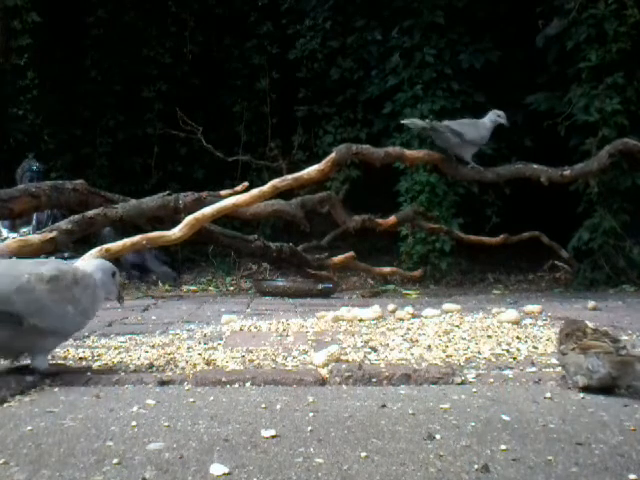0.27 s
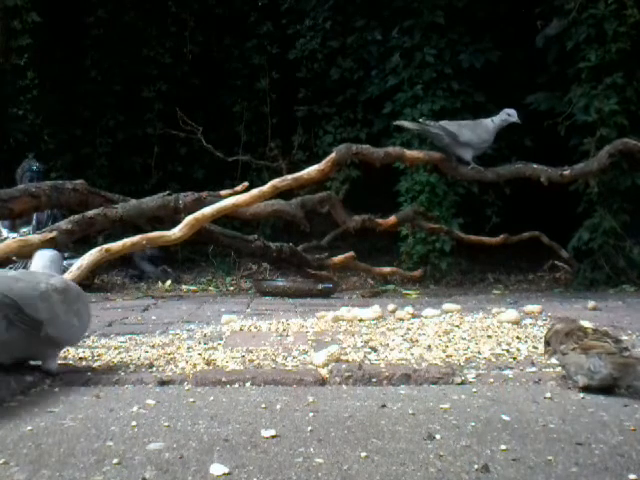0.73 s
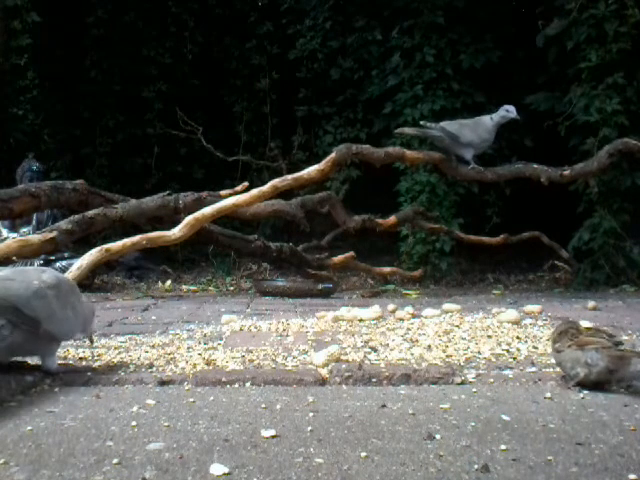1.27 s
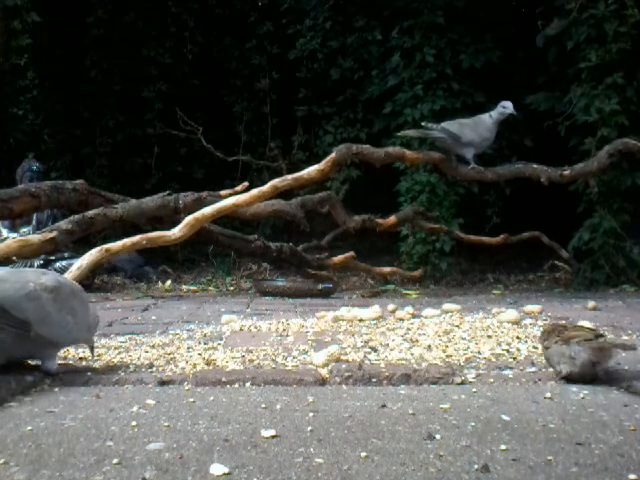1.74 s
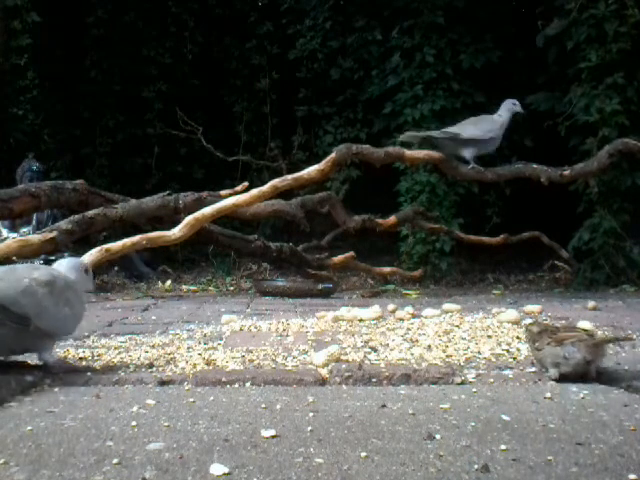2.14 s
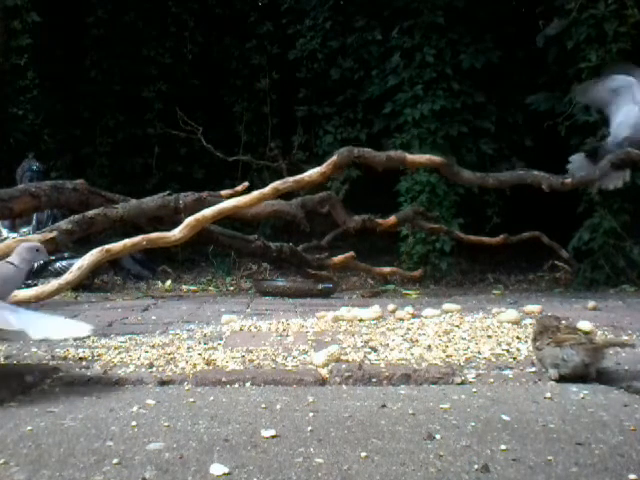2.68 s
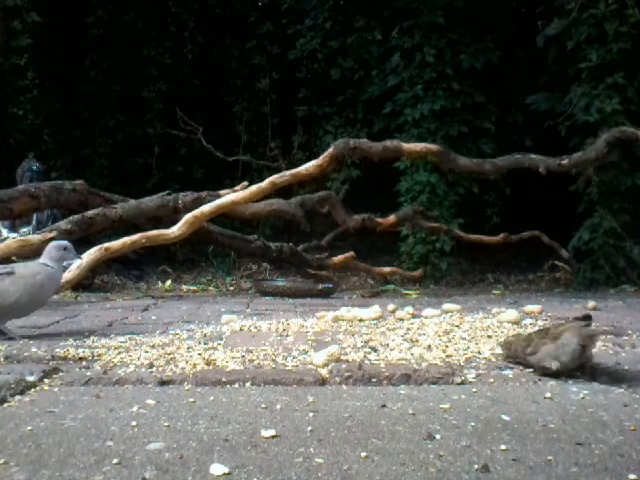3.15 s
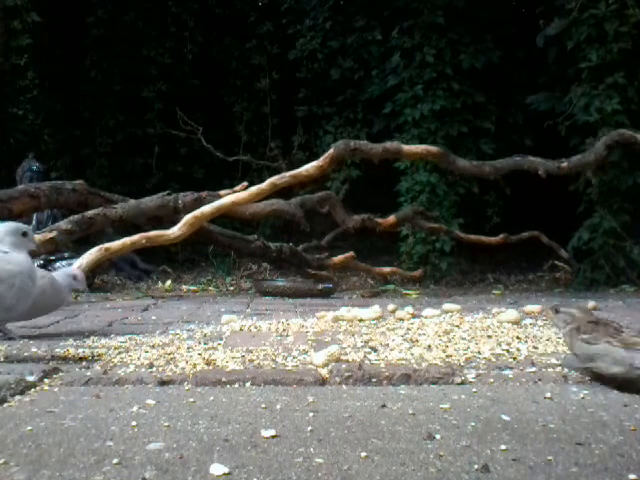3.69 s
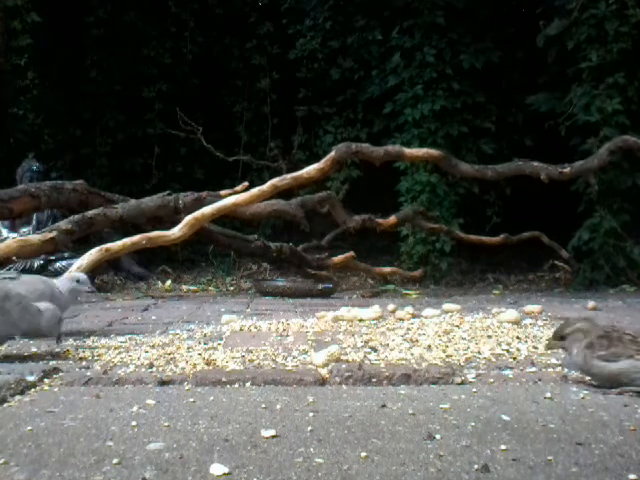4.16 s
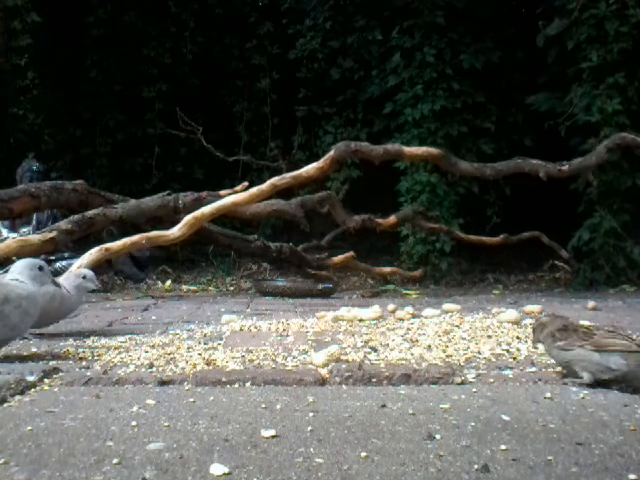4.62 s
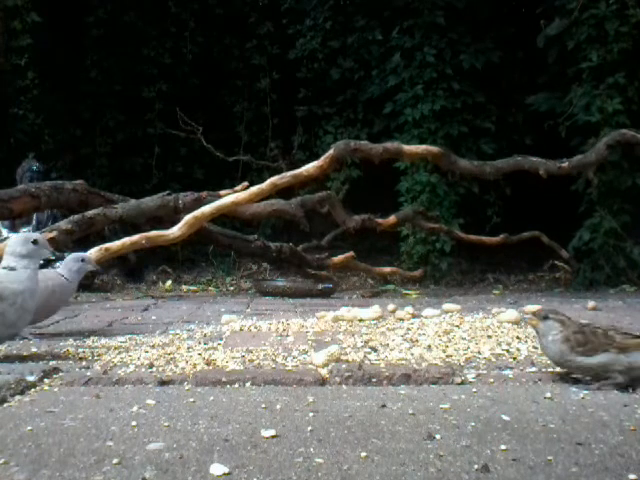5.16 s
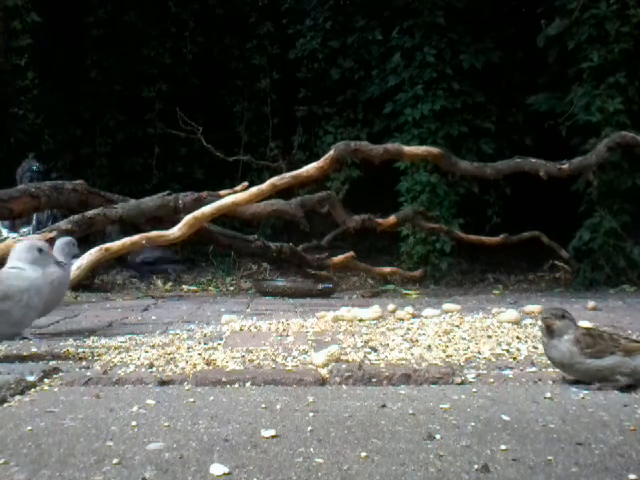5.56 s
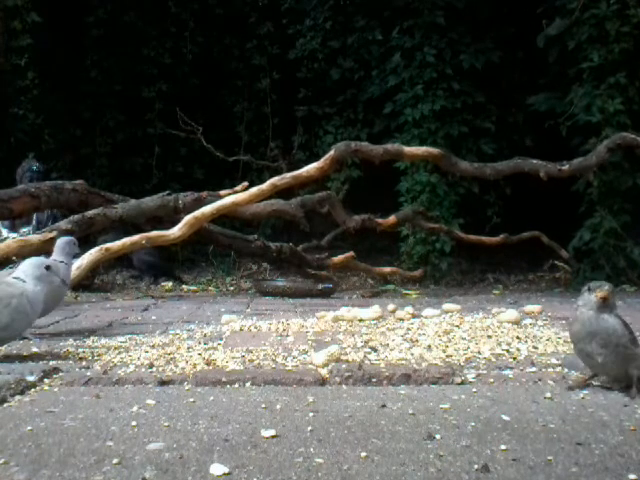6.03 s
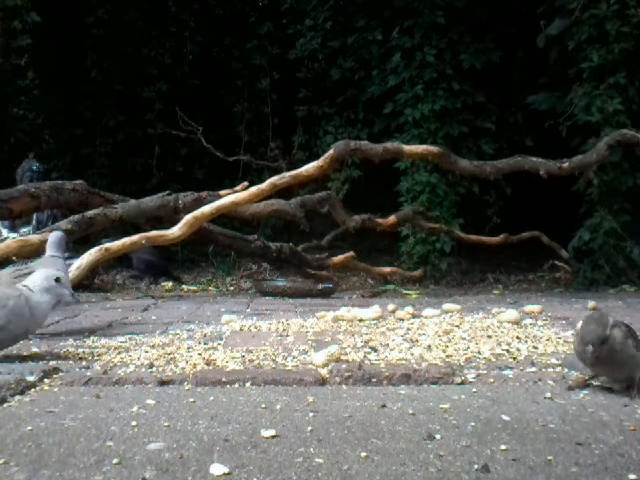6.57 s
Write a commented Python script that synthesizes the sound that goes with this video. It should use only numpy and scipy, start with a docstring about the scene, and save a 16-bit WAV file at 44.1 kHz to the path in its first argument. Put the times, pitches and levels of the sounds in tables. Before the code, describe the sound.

A jackdaw close by gives seven harsh, falling calls in a garden, over faint low rumble, small ticks, soft bumps and rustling on paving.

```python
"""A jackdaw close by gives seven harsh falling calls in a garden: syrinx partials through throat and beak, with echo.
Tiny beak clicks precede most calls; another bird is heard twice from far off as noise in throat resonances.
Doves and a sparrow shuffle on the paving among seeds: noise-burst ticks, damped-sine thumps, patchy noise rustle.
Under them lie lumpy low rumble, microphone hiss and three thin high tones."""
import sys
import numpy as np
from scipy import signal
from scipy.fft import rfft, irfft, next_fast_len
from scipy.io import wavfile
from scipy.ndimage import uniform_filter1d, map_coordinates

SR = 44100
rng = np.random.default_rng(int(sys.argv[2]) if len(sys.argv) > 2 else 0)


def master_out(mix):
    """Clip the mix to full scale and print it as 16-bit PCM to the path in sys.argv[1]."""
    frames = np.transpose(np.atleast_2d(mix))
    ceiling = np.clip(frames, -1, 1)
    pcm = np.round(ceiling * 32767).astype(np.int16)
    wavfile.write(sys.argv[1], SR, pcm)


N = 300321
TOP_HZ = 15600  # upper band limit


def amp(db):
    """Amplitude factor of a level in dB."""
    return 10 ** (np.asarray(db) / 20)


def unit(x):
    """x scaled to rms 1."""
    return x / np.sqrt(np.mean(np.abs(x) ** 2) + 1e-20)


def along(points, hz):
    """(frequency [Hz], value) points read on a log frequency axis."""
    f, v = np.transpose(points)
    return np.interp(np.log(hz + 1), np.log(f + 1), v)


def over_time(points, t):
    """(time [s], value) points read at t."""
    s, v = np.transpose(points)
    return np.interp(t, s, v)


def wobble(knots_per_s, count=N):
    """A smooth random curve: spline through normal random knots."""
    knots = rng.standard_normal(int(count * knots_per_s / SR) + 4)
    return map_coordinates(knots, [np.arange(count) * knots_per_s / SR])


def filtered(x, response):
    """x through a complex response of frequency."""
    m = next_fast_len(len(x) + 8192)
    spectrum = rfft(x, m) * response(np.fft.rfftfreq(m, 1 / SR))
    return irfft(spectrum, m)[:len(x)]


def resonance(f, hz, width_hz):
    """Causal second-order band resonance, gain 1 at its centre."""
    return 1j * f * width_hz / (hz * hz - f * f + 1j * f * width_hz)


def rush(spectrum, patchy_db):
    """Shaped noise of rms 1 with time-frequency patches of random gain."""
    z = signal.stft(rng.standard_normal(N), nperseg=512)[2]
    field = uniform_filter1d(rng.standard_normal(z.shape), 6, 0)
    field = uniform_filter1d(field, 12, 1)
    x = signal.istft(z * amp(patchy_db * unit(field)), nperseg=512)[1][:N]
    return unit(filtered(x, lambda hz: amp(along(spectrum, hz))))


def jackdaw():
    """The near bird: every call plus its own garden echo."""
    # stages and pitch of each call: (start [s], arch top [s], break [s], close [s], end [s], top [Hz],
    #  before break [Hz], low voice [Hz], glide [Hz], sag [Hz/s], glide time constant [s], closing drop [Hz])
    stages = [(.234, .262, .353, .605, .675, 1010, 814, 532, 205, 370, .048, 87),
              (.809, .823, .886, 1.043, 1.125, 1013, 814, 577, 164, 806, .044, 79),
              (2.266, 2.291, 2.38, 2.59, 2.675, 1010, 796, 515, 198, 311, .052, 80),
              (2.918, 2.945, 3.027, 3.157, 3.2, 1003, 706, 496, 141, 578, .03, 53),
              (3.978, 4.006, 4.091, 4.302, 4.385, 1008, 821, 499, 217, 224, .052, 76),
              (4.585, 4.618, 4.71, 4.845, 4.93, 1024, 781, 497, 172, 245, .048, 74),
              (5.12, 5.164, 5.219, 5.353, 5.44, 922, 843, 573, 156, 707, .043, 51)]
    # resonances and levels of each call: (tone at onset [dB], in the arch [dB], at the break [dB],
    #  after the glide [dB], at the close [dB], beak at full strength [dB], at the close [dB],
    #  throat at onset [Hz], at the break [Hz], after the glide [Hz], at the close [Hz],
    #  beak early [Hz], late [Hz], odd partials in the arch [dB], after the break [dB], at the close [dB])
    voices = [(-21.5, -24.5, -19.5, -22, -27, -21, -27, 2310, 2350, 2270, 2130, 5190, 5250, -1, -7, 0.5),
              (-19, -23.5, -20, -23.5, -28.5, -19.5, -31.5, 2010, 2420, 2410, 2230, 5090, 5780, -0.5, -12.5, 0.5),
              (-25, -24.5, -19, -24, -29, -21, -27.5, 2400, 2600, 2350, 2300, 5080, 5520, 0, -11, 2.5),
              (-26.5, -26.5, -24, -32.5, -31, -28.5, -47.5, 2600, 2650, 2100, 1900, 5700, 5670, -4.5, -3, 3.5),
              (-21.5, -27, -20, -24.5, -29.5, -21.5, -29.5, 2500, 2620, 2410, 2400, 5620, 5640, 1.5, -6, 3.5),
              (-17, -21, -17.5, -26.5, -28, -19.5, -29, 2710, 2380, 2470, 2360, 5600, 5380, -1.5, -9, 5.5),
              (-19, -26, -17.5, -21, -22, -21.5, -25, 2240, 2080, 2080, 1730, 5500, 5550, -1, -4, -6.5)]
    # roughness of each call: (halfway partials at 1005.5 Hz pitch [dB], base rasp [dB], base flutter [dB])
    grains = [(-30, -24, 2.6), (-22, -20, 2.5), (-32, -23.5, 2.6), (-26, -15, 4), (-26, -22, 2.8),
              (-22, -18, 3.8), (-18, -21, 3.8)]
    # echo strength: (frequency [Hz], gain [dB])
    echo_gain = [(700, -8), (2500, -5.5), (4000, 1), (5500, -2), (12000, 8.5)]
    out = np.zeros(N + SR)
    for row, voice, grain in zip(stages, voices, grains):
        start, x = call(row, voice, *grain)
        echo = filtered(garden(x, delay_s=.003), lambda hz: amp(along(echo_gain, hz)))
        out[start:][:len(x)] += x
        out[start:][:len(echo)] += echo
    return out[:N]


def call(row, voice, half_db, rasp_db, flutter_db, count=36):
    """One call: partials of the syrinx, each unsteady, through throat and beak."""
    # skirt under the throat resonance: (frequency [Hz], gain [dB])
    low_skirt = [(400, -37), (760, -16), (1000, -21), (1400, -12), (2000, -16), (3600, -29.5),
                 (5000, -28.5), (15800, -79.5)]
    # skirt over the beak resonance: (frequency [Hz], gain [dB])
    high_skirt = [(3000, -43), (7000, -20), (9000, -29.5), (12000, -43), (13500, -41.5), (15800, -51.5)]
    t = np.arange(round(row[0] * SR), round(row[4] * SR)) / SR
    n = len(t)
    jitter = 1 + .002 * flutter_db * wobble(70, count=n)
    f0 = uniform_filter1d(pitch_hz(t, *row), size=200) * jitter
    level_db, throat_hz, beak_db, beak_hz, odd_db = shape(t, row[:5], voice)
    # breathy onset and end: the tone is weak there, the air is not
    onset = 1 - np.exp(-(t - t[0]) / .012)
    ending = 1 - np.exp(-((t[-1] - t) / .045) ** 2)
    voiced = onset * ending
    rasp_db = rasp_db + 7 * (1 - voiced)
    turn = 2 * np.pi * np.cumsum(f0) / SR
    out, power = np.zeros(n), np.zeros(n)
    for k in np.r_[np.arange(1, count + 1), np.arange(1, 8) + .5]:
        whole = k % 1 == 0
        f = k * f0
        throat = np.abs(resonance(f, throat_hz, 1100)) ** 3 + amp(along(low_skirt, f))
        throat = throat * amp(-9 * (k == 1))  # weaker fundamental
        beak = np.abs(resonance(f, beak_hz, 1200)) ** 3 + amp(along(high_skirt, f))
        top = (f < TOP_HZ) / (1 + (f / 13300) ** 10)
        gain = throat + amp(beak_db) * beak * top
        power += throat ** 2 / 2 * whole
        # unequal half cycles set the odd partials; unequal cycles at high pitch add partials halfway
        if whole:
            tone = amp(odd_db * (k % 2))
        else:
            tone = amp(half_db + 0.055 * (f0 - 1005.5))
        high = np.clip((f - 2500) / 3000, 0, 1.2)
        tone = tone * voiced * amp((flutter_db + 2.14 * high) * wobble(60.13, count=n))
        # turbulent air smears each partial over the gap to the next, more so in the treble
        air = wobble(800, count=n) + 1j * wobble(800, count=n)
        rasp = amp(rasp_db + (10.5 + .005 * f0) * high) * air * whole
        drift = (0.094 * flutter_db + 0.42 * high) * wobble(109.13, count=n)
        phase = k * turn + rng.uniform(0, 2 * np.pi) + drift
        out += gain * np.real((tone + rasp) * np.exp(1j * phase))
    fade = np.clip(np.minimum(t - t[0], t[-1] - t) / .007, 0, 1)
    return round(t[0] * SR), fade * amp(level_db) * out / np.sqrt(power + 1e-3)


def pitch_hz(t, start, arch, brk, close, end, top_hz, edge_hz, low_hz, glide_hz, sag_hz, glide_s, close_hz):
    """A rounded arch, a break to a fall that slows to a steady sag, then the closing drop."""
    scoop_hz, scoop_s, round_s = 170, .009, .02  # pitch sets in flat and catches up; rounding of the arch top
    snap_hz, snap_s, close_s = 70, .004, .04  # quick fall right after the break; length of the closing drop

    def bend(s):
        return np.hypot(s - arch, round_s) - round_s

    high = top_hz - (top_hz - edge_hz) * bend(t) / bend(brk)
    high = high - scoop_hz * np.exp(-(t - start) / scoop_s)
    u = np.abs(t - brk)
    low = low_hz - sag_hz * u + glide_hz * np.exp(-u / glide_s) + snap_hz * np.exp(-u / snap_s)
    drop = close_hz * np.clip((t - close) / close_s, 0, 1) ** 2
    return np.where(t < brk, high, low - drop)


def shape(t, times, voice):
    """Level, resonances and odd partials follow the stages of the call."""
    attack_s, attack_db, arch_s, release_db = 0.021, 13, .06, 19.5  # of the tone
    settle_s, settle_db = 0.027, 3.5  # the tone steps down after the break
    glide_end_s, hold_s = .11, 0.0089  # break to glide end; hold into the close
    shut_db, opening_db, beak_arch_db = 24.5, 11.5, 4.5  # beak under full strength
    beak_release_db = 23  # beak fall at the end
    start, _, brk, close, end = times
    onset, arch, peak, glide, last, beak, beak_last = voice[:7]
    attack, top, settle = start + attack_s, start + arch_s, brk + settle_s
    glided, held = brk + glide_end_s, close + hold_s
    level_db = np.interp(t, [start, attack, top, brk, settle, glided, held, end],
                         [onset - attack_db, onset, arch, peak, peak - settle_db, glide, last, last - release_db])
    beak_db = np.interp(t, [start, attack, top, brk, settle, held, end],
                        [beak - shut_db, beak - opening_db, beak - beak_arch_db, beak - beak_arch_db,
                         beak, beak_last, beak_last - beak_release_db])
    throat_hz = np.interp(t, [attack, brk, glided, held], voice[7:11])
    beak_hz = np.interp(t, [top, held], voice[11:13])
    odd_db = np.where(t < brk, voice[13], np.interp(t, [brk, held], voice[14:]))
    return level_db, throat_hz, beak_db - level_db, beak_hz, odd_db


def garden(x, delay_s):
    """Hedges and walls answer: a noise tail in which each frequency dies at its own speed."""
    # reverberation: (frequency [Hz], t60 [s])
    t60 = [(500, 0.25), (2500, 0.23), (5500, 0.24), (12000, 0.21)]
    hz, t, z = signal.stft(rng.standard_normal(SR // 2), SR, nperseg=256)
    decay = amp(-60 * t / along(t60, hz)[:, None])
    tail = signal.istft(z * decay, SR, nperseg=256)[1]
    delayed = np.pad(x, (round(delay_s * SR), 0))
    return signal.fftconvolve(delayed, tail / np.linalg.norm(tail))


def beak_clicks():
    """The beak clicks open just before a call: a tiny damped knock in the throat's range."""
    # clicks: (time [s], level [dB])
    openings = [(.217, -55), (.794, -47), (2.249, -51), (2.906, -54), (3.961, -50), (5.105, -49)]
    out, t = np.zeros(N + SR), np.arange(SR // 40) / SR
    for s, db in openings:
        hit = rng.standard_normal(len(t)) + 6 * (t == 0)
        knock = unit(filtered(hit, lambda f: resonance(f, 2200, 1500) ** 2))
        out[round(s * SR):][:len(t)] += amp(db - 60 * t / 0.016) * knock
    return out[:N]


def far_bird():
    """Distance blurs the partials of hoarse calls into noise inside the throat resonances."""
    # distant calls: (start [s], end [s], level before attack and fade [dB])
    far_calls = [(-.05, 0.06, -56.5), (4.423, 4.596, -36)]
    # throat resonances: (centre [Hz], width [Hz], gain [dB])
    modes = [(1380, 1100, -9.5), (2040, 830, -3.5), (5350, 1000, -6.5)]
    attack_s, fade_db_per_s = 0.032, 49
    t = np.arange(N) / SR
    level = np.zeros(N)
    for s, end, db in far_calls:
        attack = np.clip((t - s) / attack_s, 0, 1) ** 2
        level += amp(db - fade_db_per_s * np.abs(t - s)) * attack * (t < end)

    def throat(f):
        return sum(amp(db) * np.abs(resonance(f, hz, width_hz)) ** 2 for hz, width_hz, db in modes)

    return level * amp(1.2 * wobble(60)) * unit(filtered(rng.standard_normal(N), throat))


def ticks():
    """Beaks and claws on stone and seed: a bright snap, a duller knock and a thin top."""
    # cracks: (time [s], level before a 10 dB cut [dB], dull part before a 2.5 dB lift [dB],
    #  thin top before a 1.5 dB cut [dB])
    cracks = [(0.0501, -44.5, -16.5, -28.5), (0.1373, -43, -12, -23), (2.0841, -43.5, -7, -30),
              (2.7355, -25, -18, -33), (3.2157, -29, -4.5, -24.5), (3.5125, -35.5, -10, -30),
              (3.5783, -43, -13, -14), (3.6526, -39.5, -11, -18.5), (3.7149, -34.5, -24, -31),
              (3.7804, -30.5, -11.5, -39), (3.8972, -36.5, -4.5, -27), (5.0602, -31, -23, -25),
              (5.5407, -27.5, -10.5, -1.5), (5.5766, -30.5, -2.5, -26.5), (5.619, -33.5, -1.5, -29),
              (5.7271, -29.5, -8, -24), (5.906, -37, -30.5, -34), (6.0882, -36, -25, -38.5)]
    out, t = np.zeros(N + SR), np.arange(SR // 20) / SR
    for s, db, dull_db, top_db in cracks:
        a, b, c = rng.standard_normal((3, len(t))) + 6 * (t == 0)  # a sharp first contact, then grit
        snap = unit(filtered(a, lambda f: resonance(f, 4920, 2500) ** 2)) * amp(-60 * t / 0.034)
        knock = unit(filtered(b, lambda f: resonance(f, 940, 1800) ** 2))
        knock = knock * amp(dull_db + 2.5 - 60 * t / 0.035)
        top = unit(filtered(c, lambda f: resonance(f, 12500, 5000) ** 2))
        top = top * amp(top_db - 1.5 - 60 * t / 0.0099)
        out[round(s * SR):][:len(t)] += amp(db - 10) * (snap + knock + top)
    return out[:N]


def thumps():
    """Soft bumps of feet and wings: a heavily damped sine under a dull puff of noise."""
    # bumps: (time [s], level [dB], pitch [Hz])
    bumps = [(3.082, -30, 313), (3.22, -34, 100), (3.77, -43, 78.1), (4.811, -25, 143), (4.837, -26, 57),
             (4.921, -27, 260), (5.17, -30, 950), (5.222, -33, 96), (5.249, -30, 650), (5.339, -31.5, 80),
             (5.374, -31.5, 870), (5.413, -26.5, 91.5), (5.469, -31, 37.4), (5.574, -34.5, 530),
             (5.705, -31, 810), (5.718, -32.5, 106), (6.347, -41.5, 54)]
    out, t = np.zeros(N + SR), np.arange(SR // 8) / SR
    for s, db, hz in bumps:
        life_s = 0.2 / hz + 0.0053
        push = t / life_s * np.exp(-2 * t / life_s) * np.sin(2 * np.pi * hz * t) * np.e
        puff = unit(filtered(rng.standard_normal(len(t)), lambda f: resonance(f, 350, 900) ** 2))
        puff = 0.33 * puff * amp(-60 * t / 0.078) * (1 - np.exp(-t / 0.0014))
        out[round(s * SR):][:len(t)] += amp(db) * (push + puff)
    return out[:N]


def ground():
    """Lumpy rumble, patchy rustle of feathers and seeds, steady hiss and thin high tones."""
    # rumble spectrum: (frequency [Hz], relative density [dB])
    rumble_spectrum = [(12, -38.5), (20, -10.5), (76, 0), (120, -2), (163, -5), (742, -16.5), (1140, -24.5),
                       (1500, -26), (1950, -50.5), (3300, -120)]
    # rumble course: (time [s], level [dB])
    rumble_level = [(0.0, -63), (0.47, -50.5), (0.81, -57.5), (1.02, -49.5), (1.23, -59.5), (1.44, -70),
                    (2.03, -69), (2.58, -46), (2.85, -61), (3.1, -48.5), (3.4, -58), (3.75, -57.5),
                    (4.05, -48.5), (4.84, -47.5), (5.04, -44), (5.56, -47.5), (6.16, -54), (6.62, -60.5),
                    (6.81, -54.5)]
    # rustle spectrum: (frequency [Hz], relative density [dB])
    rustle_spectrum = [(530, -35.5), (900, -2.5), (2380, -3), (3170, -2.5), (4430, 2), (5500, 4.5),
                       (8070, -7.5), (14700, -13), (15800, -21)]
    # rustle course: (time [s], level [dB])
    rustle_level = [(0.0, -63.5), (0.2, -59.5), (0.78, -60), (1.25, -64), (1.536, -72.5), (1.836, -70.5),
                    (2.78, -55), (2.9, -63.5), (3.3, -56), (3.618, -62.5), (3.95, -53), (5.0, -49),
                    (5.5, -49.5), (5.864, -55), (6.02, -54.5), (6.436, -63), (6.81, -63)]
    # hiss spectrum: (frequency [Hz], relative density [dB])
    hiss_spectrum = [(15, -27.5), (25, 0), (43, -4.5), (99, 0.5), (359, -5), (2170, -18), (5730, -16.5),
                     (7910, -22), (15500, -20)]
    # thin high tones: (frequency [Hz], mean peak level [dB])
    whine_tones = [(9168, -87.5), (14320, -96.5), (14998, -92)]
    hiss_db = -64
    t = np.arange(N) / SR
    lumps_db = 1.7 * wobble(16)
    rumble = unit(amp(lumps_db) * rush(rumble_spectrum, patchy_db=2.5))
    rumble = amp(over_time(rumble_level, t)) * rumble
    stir_db = 1.6 * wobble(25)
    rustle = unit(amp(stir_db) * rush(rustle_spectrum, patchy_db=-1.5))
    rustle = amp(over_time(rustle_level, t)) * rustle
    whine = np.zeros(N)
    for hz, db in whine_tones:
        whine += amp(db + 1.5 * wobble(6)) * np.sin(2 * np.pi * hz * t + 1.5 * wobble(30))
    hiss = amp(hiss_db) * rush(hiss_spectrum, patchy_db=0.4)
    return rumble + rustle + whine + hiss


def scene():
    """Sum of all sources, one channel."""
    near_bird = jackdaw() + beak_clicks()
    return (near_bird + far_bird() + ticks() + thumps() + ground())[None]


def record(dry):
    """The small camera keeps nothing above its band limit: a brick-wall low-pass."""
    return filtered(dry[0], lambda hz: hz < TOP_HZ)[None]


dry = scene()
out = record(dry)
master_out(out)
```